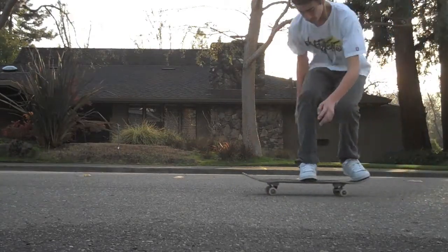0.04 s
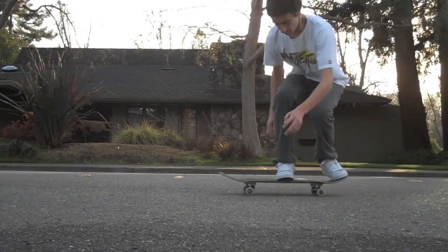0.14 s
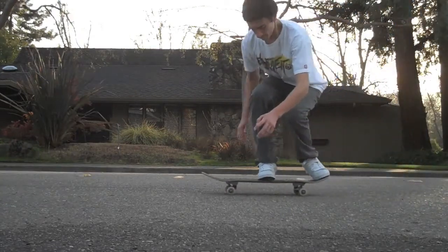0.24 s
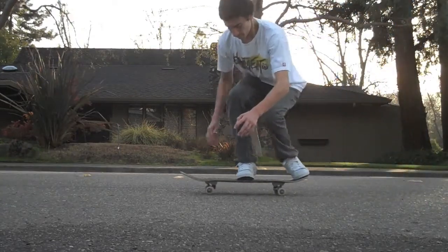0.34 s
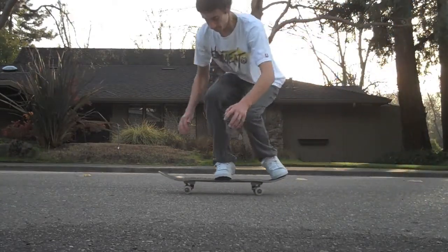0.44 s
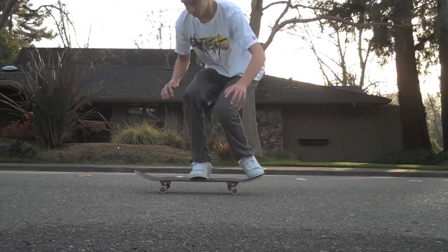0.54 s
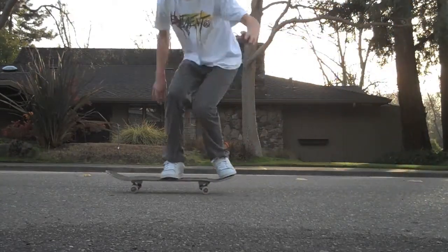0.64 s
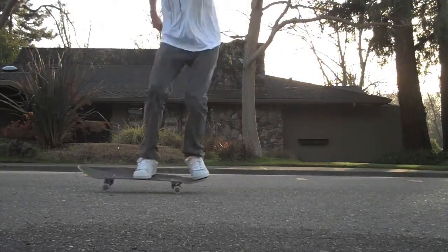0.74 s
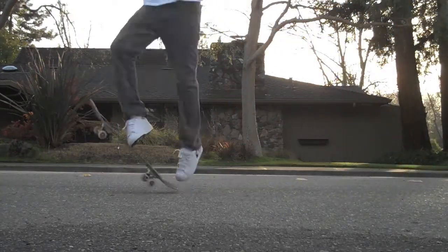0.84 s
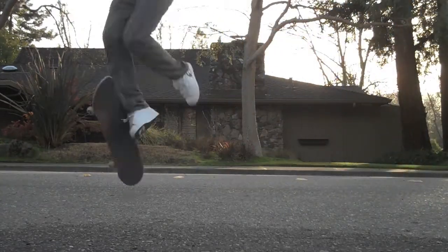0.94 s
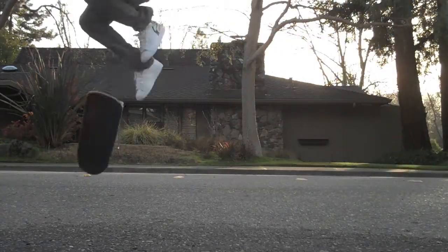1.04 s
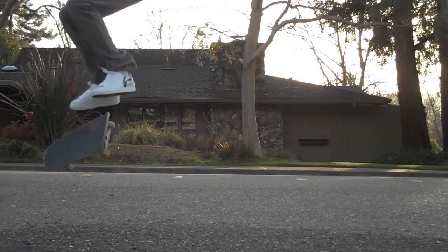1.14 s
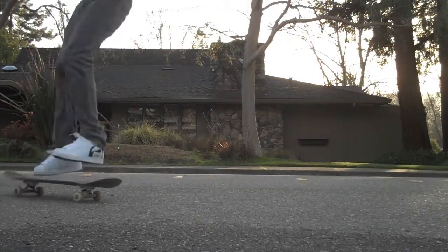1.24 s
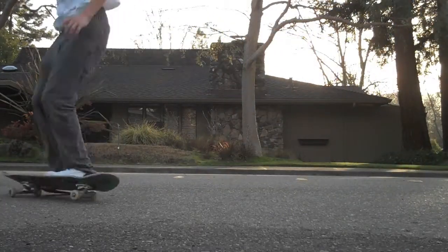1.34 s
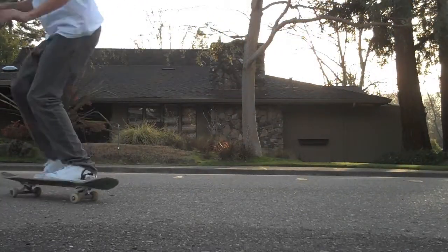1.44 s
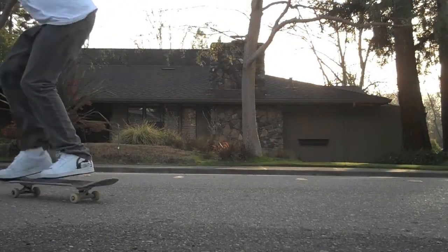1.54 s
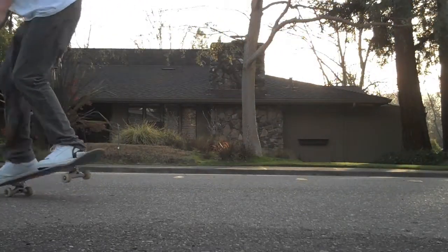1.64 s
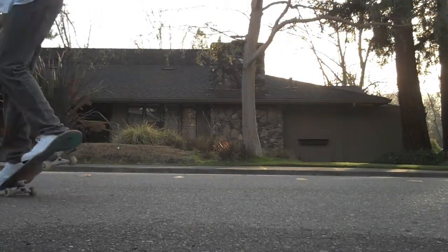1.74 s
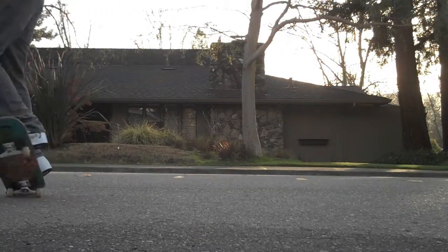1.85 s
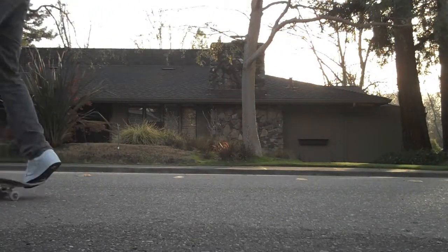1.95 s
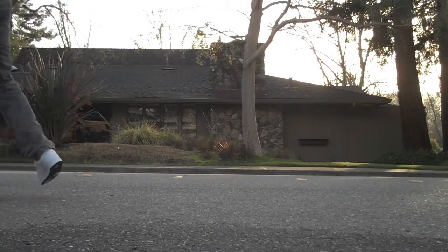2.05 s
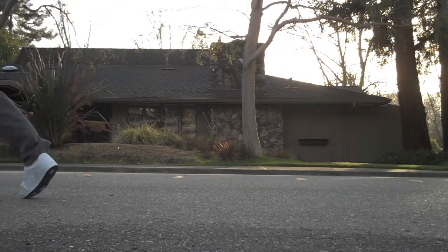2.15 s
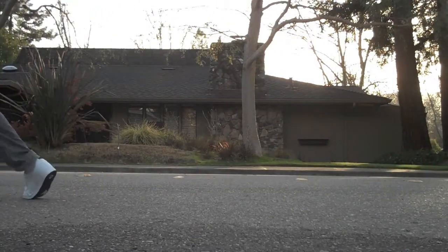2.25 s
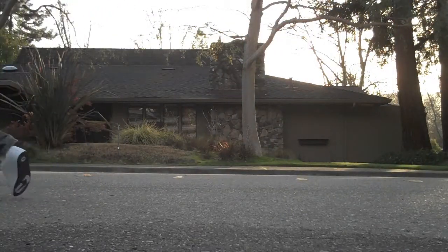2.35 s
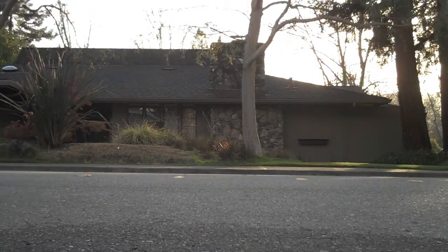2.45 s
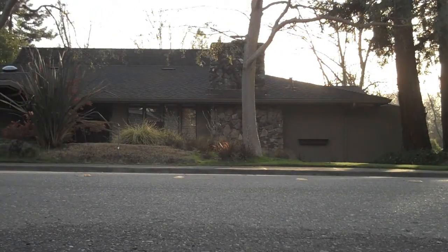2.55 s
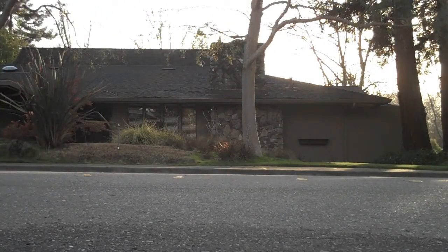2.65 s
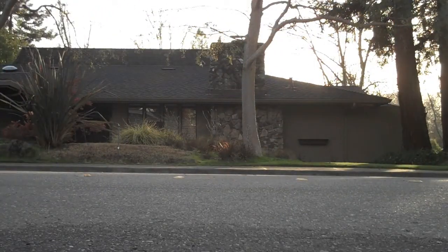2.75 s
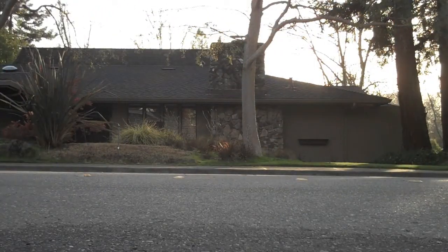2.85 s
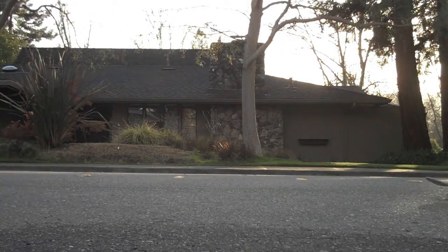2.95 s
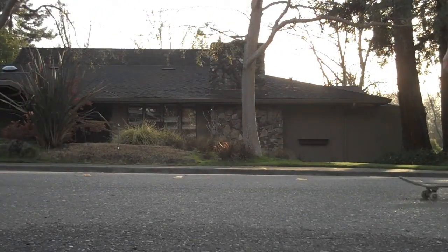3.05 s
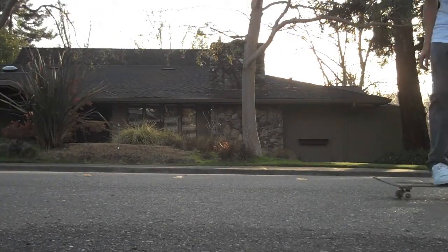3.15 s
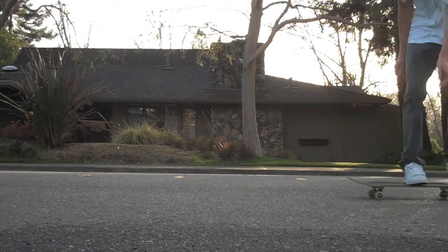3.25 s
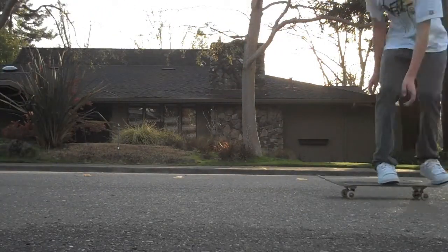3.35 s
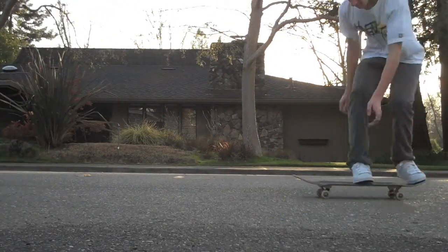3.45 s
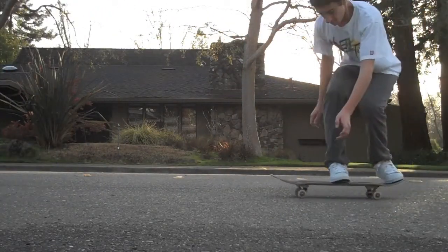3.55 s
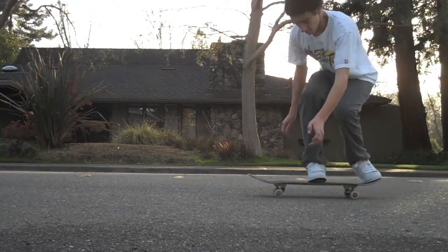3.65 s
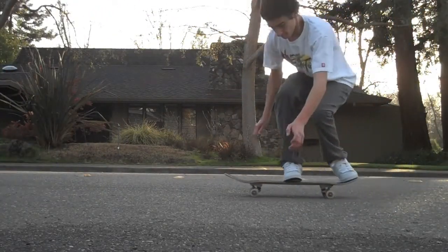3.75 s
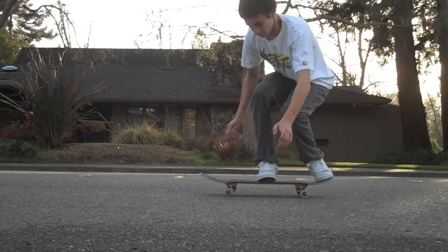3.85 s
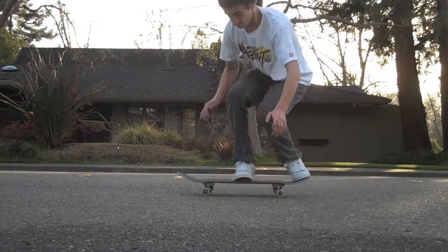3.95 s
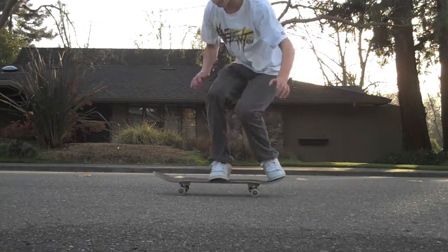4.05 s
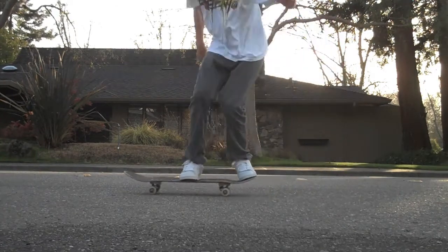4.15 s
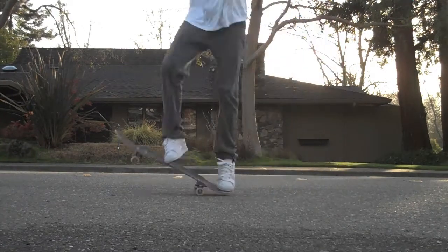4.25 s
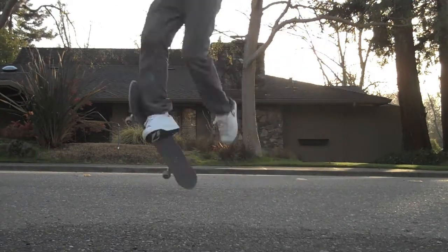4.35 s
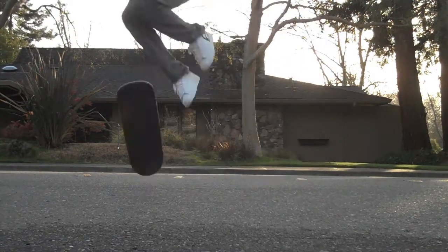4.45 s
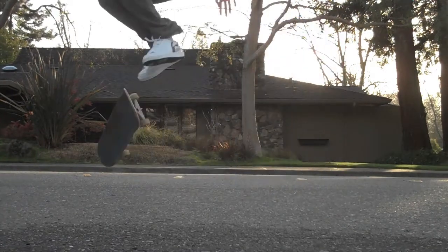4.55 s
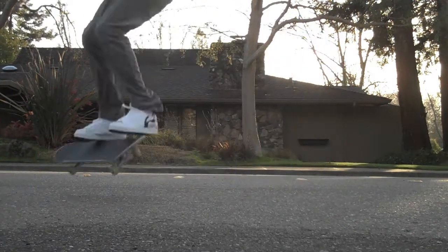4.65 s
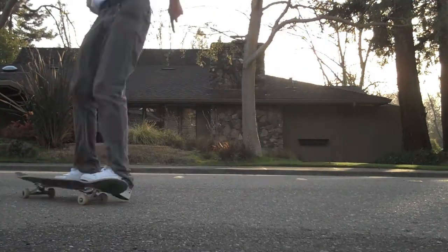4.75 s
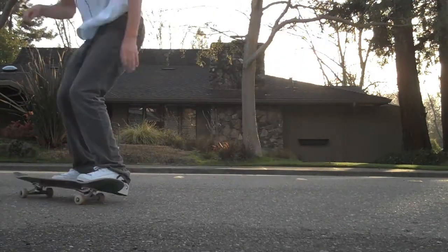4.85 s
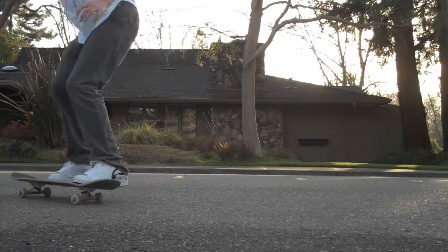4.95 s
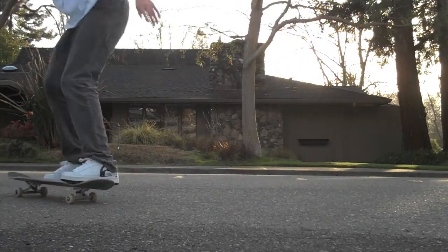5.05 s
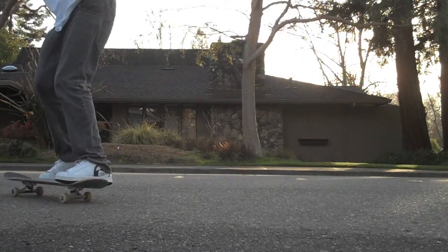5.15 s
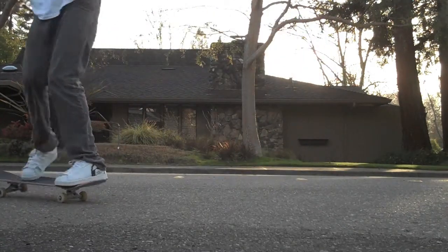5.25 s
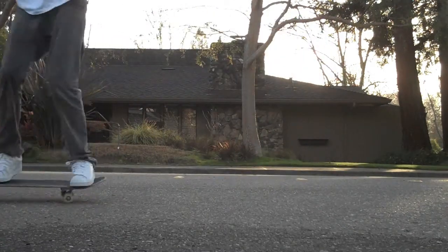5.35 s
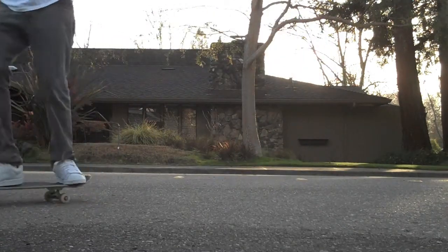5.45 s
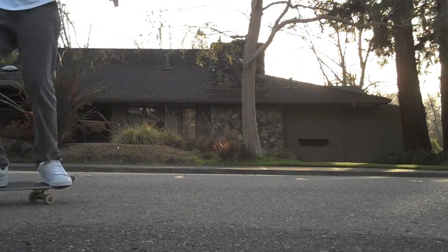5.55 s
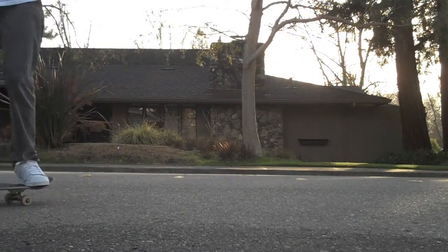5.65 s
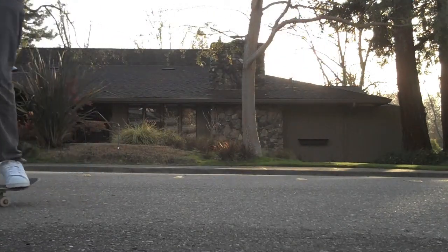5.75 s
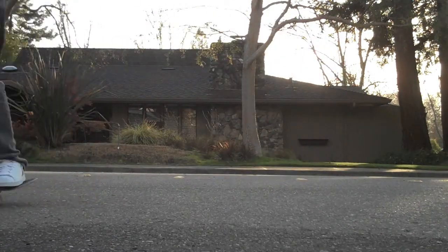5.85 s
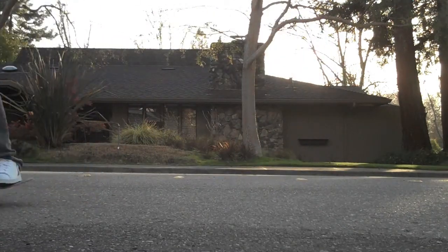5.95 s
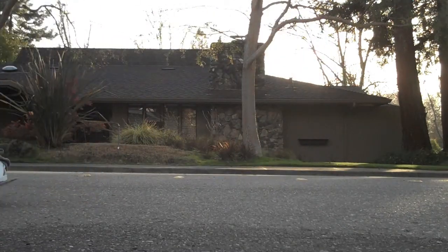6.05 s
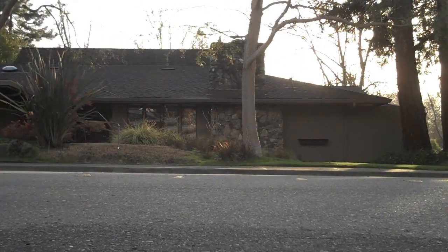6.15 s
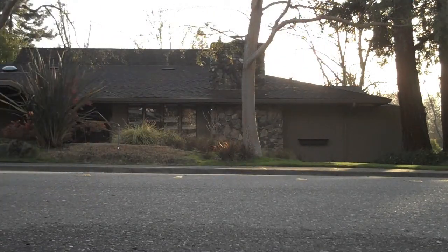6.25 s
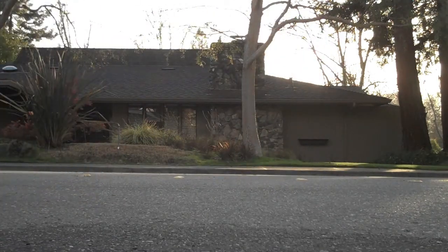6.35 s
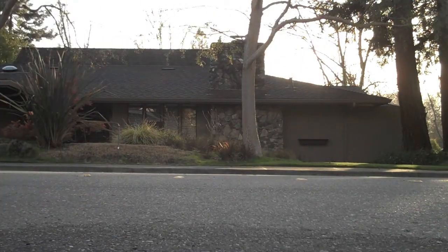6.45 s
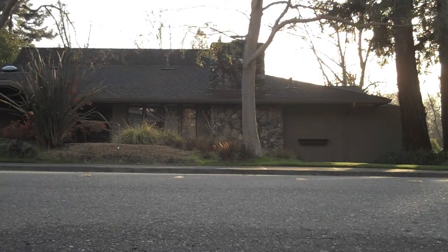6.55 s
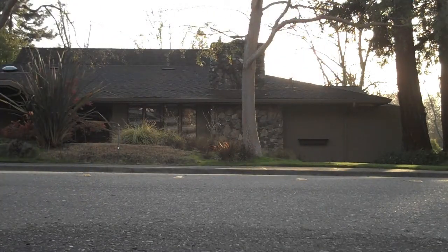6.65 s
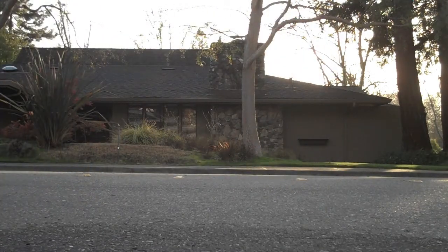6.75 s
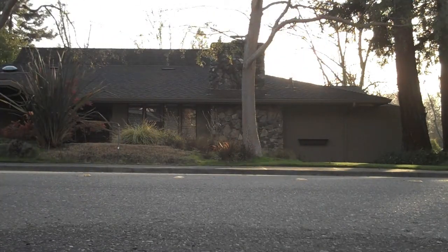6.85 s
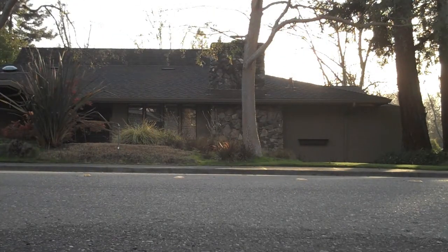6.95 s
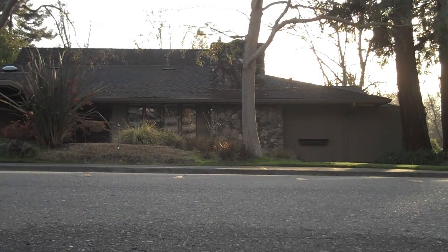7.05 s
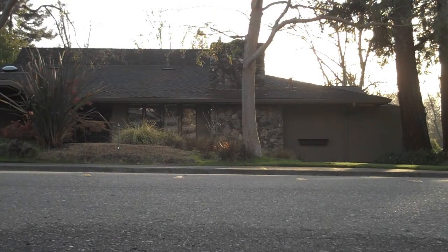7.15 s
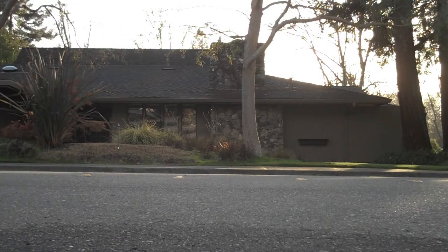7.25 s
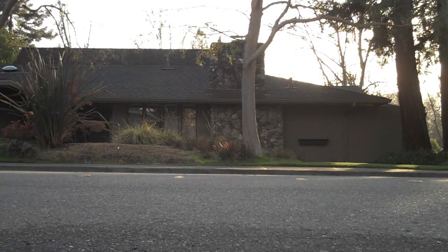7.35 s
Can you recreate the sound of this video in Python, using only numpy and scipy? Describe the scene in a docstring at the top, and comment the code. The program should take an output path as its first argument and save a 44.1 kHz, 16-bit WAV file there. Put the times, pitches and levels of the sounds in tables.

```python
"""A quiet street lined with houses, where a skateboard rolls past twice on coarse asphalt.
The rough road excites wheels and deck as noise. On each pass the tail pops on the road and rings in
its modes, the board flips with its bearings whirring, and wheels, trucks and deck land in a clatter.
Shoes scuff and squeak, the tail drags and the deck knocks as the rider steps off. Road and houses
reflect the sound; the street fades and a muffled low rumble closes the scene."""
import sys
import numpy as np
from scipy import signal
from scipy.fft import rfft, irfft
from scipy.io import wavfile

SR = 44100
rng = np.random.default_rng(int(sys.argv[2]) if len(sys.argv) > 2 else 0)


def wav_record(signal):
    """Record a signal, one row per channel, as 16-bit PCM in the file named by sys.argv[1]."""
    frames = np.transpose(np.atleast_2d(signal))
    bounded = np.clip(frames, -1, 1)
    # unit amplitude maps onto the largest positive 16-bit level
    quanta = np.round(bounded * 32767).astype(np.int16)
    wavfile.write(sys.argv[1], SR, quanta)


N = 326340
TIME = np.arange(N) / SR
HIT_TIME = TIME[:SR // 6]

# wheel load as the rider crouches and springs, one curve per run-up: t/s, level/dB
RUN_UPS = [
    [(0.015, -46.5), (0.065, -48.5), (0.125, -51.5), (0.147, -48), (0.185, -52.5), (0.479, -51.5),
     (0.511, -51), (0.533, -52), (0.645, -44), (0.8, -48.5)],
    [(2.6, -51), (2.622, -47.5), (3.49, -47.5), (3.688, -50.5), (3.748, -47.5), (3.954, -53), (4.046, -48),
     (4.176, -47), (4.184, -49.5), (4.25, -48.5)],
]
# slow coasting after the tricks: start/s, end/s, initial level/dB
COASTS = [(1.3, 2.592, -57.5), (4.731, 5.077, -60), (5.2, 5.86, -60.5), (6.039, 6.97, -61)]
# soles and wheels sliding: t/s, duration/s, roar level/dB, relative growl/dB, relative hiss/dB
SCUFFS = [(0.896, 0.081, -51.5, -3.5, 1), (1.296, 0.13, -53.5, -3, 2.5), (1.541, 0.072, -45, -3.5, -1.5),
          (1.648, 0.0095, -52.5, -15, -3), (1.899, 0.11, -43.5, -7.5, -3), (1.936, 0.057, -40, -7, -3),
          (2.053, 0.13, -41, 1, -3.5), (3.05, 0.28, -49.5, -17, 3), (4.347, 0.079, -49.5, -3, -2),
          (4.632, 0.06, -47.5, -2.5, 2), (4.747, 0.15, -46.5, -8, -9), (5.019, 0.042, -50.5, -14, -5),
          (5.198, .065, -59, -27, 1.5), (5.275, 0.075, -41.5, -2, 1), (5.342, .15, -41, -8, -4),
          (5.677, 0.16, -50.5, -24, 3.5), (5.87, 0.05, -65.5, 0, 8), (6.031, 0.079, -52, -10, -1.5),
          (6.108, 0.11, -47.5, -3.5, -2.5), (6.198, .11, -52.5, -2.5, 1.5), (6.663, 0.057, -55, -18, 1),
          (6.814, 0.069, -49, -7, 3.5)]
# spectra of the three rolling noises and of the bearings: f/Hz, spectral density/dB
GROWL_SPECTRUM = [(40, -29.5), (90, -20.5), (160, -11), (280, -4), (420, -1), (800, 0), (1000, 0.5),
                  (1500, -39)]
ROAR_SPECTRUM = [(500, -17), (850, -7.5), (1000, -5), (1250, 2), (1900, 3.5), (2400, -0.5), (3200, -9.5),
                 (4500, -35)]
HISS_SPECTRUM = [(2200, -10.5), (3500, 1), (4300, -1), (6500, 0), (8500, -3.5), (10500, -6), (12000, -11.5),
                 (14000, -17.5)]
BEARING_SPECTRUM = [(300, -13.5), (650, -2.5), (1300, -0.5), (2000, 0.5), (2700, -8), (3600, -16),
                    (6000, -22.5), (12000, -30)]
# tail on the road, two strikes to a pop: t/s, level/dB, contact decay/s, mode frequency ratio
POPS = [(0.8234, -18.5, 0.0019, 1.0), (0.8254, -21, .0022, 0.86), (4.2657, -17.5, 0.0025, 0.99),
        (4.2678, -27, .003, .86)]
# modes of the tail tip and of the maple deck with its trucks: f/Hz, level/dB, T60/s
TAIL_MODES = [(441, -20.5, 0.045), (1070, -16.5, 0.064), (1430, -9, 0.018), (1990, -11, 0.017),
              (2560, -0.5, 0.0068), (2995, 1.5, 0.011), (3270, 5, 0.0098), (3970, -5, 0.011),
              (5300, -14, 0.013), (7210, -13.5, .022)]
DECK_MODES = [(456, -22, 0.083), (622, -1, 0.044), (701, 0, 0.067), (1007, -1.5, 0.051),
              (1260, -14.5, 0.022), (1170, 12.5, .04), (1667, -1, 0.032), (1797, 8, 0.044),
              (2112, 0, 0.057), (2230, -1, 0.1), (2542, 5, 0.031), (2800, -3.5, 0.088), (3180, -1.5, 0.045),
              (3390, 2, 0.043), (3700, 2, 0.058)]
# the board slams down: t/s, level/dB, brightness/Hz, relative thud/dB, wheel spacing/s,
# loss per wheel/dB, rebound delay/s, rebound/dB re slam, second rebound/dB re first
LANDINGS = [(1.2478, -14.5, 1820, -9, .0051, 0.9, .0395, -7, -5.5),
            (4.6912, -9.5, 1570, -10, .0046, 1.9, 0.037, -7.5, -8),
            (1.9885, -12, 1150, -13, .003, 6.5, .0255, -12.5, -28)]
# knocks of deck and shoes: t/s, level/dB, brightness/Hz, relative thud/dB, relative crack/dB
KNOCKS = [(1.207, -40.5, 1245, 1, -1), (1.3498, -34.5, 1570, -23, -3.5), (1.3749, -29.5, 1910, -7.5, -2.5),
          (1.5934, -26, 2000, -26, -24), (1.819, -28, 1200, -20, -17), (1.827, -26.5, 1100, -21, -16),
          (1.839, -27, 1300, -9, -17), (1.969, -34, 1140, -10, -16), (2.832, -32.5, 1730, -27, -8),
          (3.781, -37.5, 820, -3, -6), (4.637, -32, 740, -5, -12), (4.817, -35, 1410, -3.5, 0),
          (5.393, -32, 1650, -9.5, -1.5), (5.439, -32, 1670, -12, -5), (6.699, -46, 1900, -30, -6),
          (6.84, -33.5, 2000, -14, 2), (6.897, -42.5, 1576, -18, -5)]
# loose stones cracking under a wheel or sole: t/s, level/dB
STONES = [(3.069, -43), (3.171, -41.5), (3.329, -41), (3.456, -41), (3.774, -41.5), (4.051, -44.5),
          (4.168, -40), (5.272, -43.5), (5.289, -39.5), (5.3021, -32), (5.312, -34.5), (5.319, -39),
          (5.342, -33.5), (5.351, -42), (5.368, -30.5), (5.408, -34), (5.767, -40.5), (5.843, -36),
          (5.857, -40.5), (5.994, -49), (6.142, -50), (6.18, -48), (6.23, -49.5), (6.388, -38.5),
          (6.4, -39.5), (6.471, -57), (6.68, -48.5), (6.723, -48.5)]
# wheels spinning freely during a flip: start/s, end/s, initial level/dB
SPINS = [(0.942, 1.275, -47), (4.383, 4.687, -47)]
# tail dragging on the road: t/s, duration/s, level/dB
DRAGS = [(1.59, 0.0095, -28), (1.815, 0.034, -27), (1.858, .03, -39), (5.732, 0.079, -47.5),
         (6.135, .06, -51.5), (6.831, 0.024, -33), (6.86, 0.043, -49)]
# rubber sole twisting on the deck: t/s, initial f/Hz, level/dB
SQUEAKS = [(.935, 3700, -43), (5.198, 4100, -52.5), (5.228, 2900, -53)]
# spectra of near and far reflections, ambient air and closing rumble: f/Hz, spectral density/dB
NEAR_ECHO_SPECTRUM = [(60, -27.5), (200, 10.5), (450, 4.5), (900, 2), (1800, 1.5), (2400, -2.5),
                      (3300, -10.5), (5000, 0.5), (10000, -40.5), (15000, -47.5)]
FAR_ECHO_SPECTRUM = [(150, -10.5), (450, -2.5), (900, -0.5), (1300, -2.5), (1750, -8), (2150, -3.5),
                     (2550, -15), (3400, -17.5), (6000, -31.5), (12000, -43)]
AIR_SPECTRUM = [(20, 3.5), (60, -13.5), (150, -4), (600, 0), (1800, -3), (4000, -11.5), (9000, -15),
                (14000, -41.5)]
RUMBLE_SPECTRUM = [(18, -53.5), (30, -23), (115, 0), (149, -8), (201, -5.5), (292, -14.5), (461, -10),
                   (726, -17.5), (939, -16.5), (1080, -22), (1730, -18.5), (2200, -21.5), (3400, -36.5),
                   (4420, -89), (7480, -120)]
# envelope of the rumble: t/s, relative level/dB
RUMBLE_ENVELOPE = [(7.0, -62), (7.024, -48.5), (7.108, -40), (7.268, -46.5), (7.286, -47), (7.376, -39.5),
                   (7.4, -45.5)]


def rolling(usual_load_db=-49.5, hollow_hz=497, sag_hz_per_db=16.5, judder_db=1.08):
    """Roughness excitation: stones under the wheels drive a hollow growl, the deck's roar and a hiss."""
    load = wheel_load()
    growl_gain, roar_gain, hiss_gain = road_gains(load, usual_load_db)
    excess_db = np.clip(20 * np.log10(load + 1e-9) - usual_load_db, -10, 10)
    pitch_hz = hollow_hz - sag_hz_per_db * excess_db   # the hollow note sinks under load
    roughness = bumps(per_s=170, spread_db=2.5, decay_s=0.0012, steady=1.0)
    force = rng.standard_normal((4, N)) * roughness
    hollow = rms_one(band(resonance(force[0], pitch_hz, width_hz=95), 260, 1300))
    growl = rms_one(coloured(force[1], GROWL_SPECTRUM) + from_db(-1) * hollow)
    roar = coloured(force[2], ROAR_SPECTRUM)
    hiss = coloured(force[3], HISS_SPECTRUM)
    road = growl_gain * growl + roar_gain * roar + hiss_gain * hiss
    return road * from_db(judder_db * drift(30))


def wheel_load(lift_s=0.034, coast_rise_db_per_s=1.5):
    """Rolling noise follows the contact load, which vanishes while the board is in the air."""
    load = np.zeros(N)
    for curve in RUN_UPS:
        on_road = gate(curve[0][0] - lift_s, curve[-1][0] + lift_s, lift_s, lift_s)
        load += from_db(in_time(curve)) * on_road
    for start, end, db in COASTS:
        load += from_db(db + coast_rise_db_per_s * (TIME - start)) * gate(start, end, lift_s, lift_s)
    return load


def road_gains(load, usual_load_db):
    """Incoherent sources add in power: rolling and scuffs set the gains of growl, roar and hiss."""
    growth = np.array([[0.066], [0], [0.2]])   # extra dB for each dB of load
    power = np.outer(from_db([2, -0.5, -2.5]), load) ** 2
    power *= (load / from_db(usual_load_db) + 1e-9) ** (2 * growth)
    for start, length, db, growl_db, hiss_db in SCUFFS:
        scuff = from_db(db) * gate(start, start + length, 0.18 * length, 0.31 * length)
        power += np.outer(from_db([growl_db, 0, hiss_db]), scuff) ** 2
    balance = from_db([[-1], [-0.2], [-1]])
    return balance * np.sqrt(power)


def tail_pops(chip_db=-9, scrape_db=-16):
    """Impact excitation: the hard tail tip rings in its modes and scrapes the road for an instant."""
    out = np.zeros(N)
    for s, db, decay_s, ratio in POPS:
        modes = np.array(TAIL_MODES) * [ratio, 1, 1]
        tip = unit_blow(band(ringing(modes, scatter_db=1.4), 290, 8300))
        chip = unit_blow(band(crunch(decay_s), 1800, 4500))
        scrape = unit_blow(band(crunch(0.025), 4500, 9000))
        add(out, s, from_db(db) * (tip + from_db(chip_db) * chip + from_db(scrape_db) * scrape))
    return out


def deck_impacts(ring_db=-4, weight_db=-5, heavy_db=-19, buzz=0.35):
    """Each impact gives contact noise and free vibration of the deck, a low thud and a bright crack."""
    out = np.zeros(N)
    for s, db, hz, thud_db, crack_db, duration_ratio in contacts():
        # only heavy blows shake the trucks and carry the rider's weight down into the bass
        heavy = np.tanh(from_db(db - heavy_db))
        rattle = buzz * heavy
        contact = band(crunch(0.003 * duration_ratio, rattle / 2), hz / 2.1, hz * 1.655, order=3)
        deck = band(ringing(DECK_MODES, scatter_db=1.8), hz / 2, hz * 2.93)
        body = unit_blow(unit_blow(contact) + from_db(ring_db) * unit_blow(deck))
        thud = unit_blow(band(crunch(0.0074), 370, 740))
        thud += heavy * from_db(weight_db) * unit_blow(band(crunch(0.007), 32, 260))
        crack = band(crunch(0.0029 * duration_ratio, rattle), 3500, 10000)
        crack = unit_blow(band(crack, 1500, 6600, order=1))
        blow = from_db(-0.13) * body + from_db(thud_db - 1) * thud + from_db(crack_db - 0.76) * crack
        add(out, s, from_db(db) * blow)
    return out


def contacts(stone_hz=1650, kick_hz=1420, rebound_hz=1170, kick_delay_s=0.019, truck_gap_s=0.015):
    """Inelastic collisions, each rebound weaker; rows as in KNOCKS, plus a contact duration ratio."""
    rows = [(*knock, 1) for knock in KNOCKS]
    rows += [(s, db, stone_hz, -12, 2, 0.85) for s, db in STONES]
    # the deck kicks back after each strike of the tail
    rows += [(s + kick_delay_s, -26.5, kick_hz, -24.5, -20, 1) for s, *_ in POPS]
    for s, db, hz, thud_db, gap_s, loss_db, rebound_s, rebound_db, second_db in LANDINGS:
        for wheel in range(4):
            rows.append((s + wheel * gap_s, db - wheel * loss_db, hz, thud_db, -7, 0.9))
        for truck in range(2):
            bounce_s = s + rebound_s + truck * truck_gap_s
            rows.append((bounce_s, db + rebound_db + truck * second_db, rebound_hz, -4.5, -6.5, 1))
    return rows


def bearing_whirr(loss_db_per_s=25, edge_s=0.05):
    """Free rotation: off the road, the noise of the bearings decays exponentially as they run down."""
    envelope = np.zeros(N)
    for start, end, db in SPINS:
        run_down_db = loss_db_per_s * np.maximum(TIME - start, 0)
        envelope += from_db(db - run_down_db) * gate(start, end, edge_s, edge_s)
    return envelope * coloured(rng.standard_normal(N), BEARING_SPECTRUM)


def tail_drags(deck_hz=1655, edge_s=0.003):
    """Forced vibration: the wooden tail catches on stone after stone and drives a deck resonance."""
    force = rng.standard_normal(N) * bumps(per_s=250, spread_db=3.5, decay_s=0.0015, steady=0.6)
    honk = band(resonance(force, np.full(N, deck_hz), width_hz=290), 900, 3300)
    envelope = sum(from_db(db) * gate(s, s + length, edge_s, edge_s) for s, length, db in DRAGS)
    return envelope * rms_one(honk)


def sole_squeaks(length_s=0.024, rise_hz_per_s=45000, jitter_hz=300):
    """Stick-slip friction: rubber on the deck gives short, rough, rising whistles."""
    out = np.zeros(N)
    t = TIME[:int(length_s * SR)]
    envelope = np.sin(np.pi * t / length_s)
    for s, hz, db in SQUEAKS:
        pitch_hz = hz + rise_hz_per_s * t + jitter_hz * drift(900)[:len(t)]
        add(out, s, from_db(db) * envelope * np.sin(2 * np.pi * np.cumsum(pitch_hz) / SR))
    return out


def street_echoes(x, near_db, far_db, near_decay_s, far_t60_s, far_hold_s):
    """Diffuse reflection: road and kerb scatter at once; houses and trees return a long, dull wash."""
    t = TIME[:SR * 3 // 2]
    near = coloured(rng.standard_normal(len(t)), NEAR_ECHO_SPECTRUM)
    near *= (1 - np.exp(-t / 0.0093)) * np.exp(-t / near_decay_s)
    far = coloured(rng.standard_normal(len(t)), FAR_ECHO_SPECTRUM)
    far *= (1 - np.exp(-t / 0.025)) * from_db(-60 * np.maximum(t - far_hold_s, 0) / far_t60_s)
    response = from_db(near_db) * near / np.linalg.norm(near)
    response += from_db(far_db) * far / np.linalg.norm(far)
    return signal.fftconvolve(x, response)[:N]


def closing_rumble(start_s=6.98, rise_s=0.021, lumps_db=2.7, cutoff_hz=3450):
    """Random amplitude modulation makes a low noise lumpy; a low-pass filter muffles it."""
    onset = np.clip((TIME - start_s) / rise_s, 0, 1)
    noise = coloured(rng.standard_normal(N), RUMBLE_SPECTRUM)
    envelope = onset * from_db(in_time(RUMBLE_ENVELOPE) + 1 + lumps_db * drift(40))
    return signal.sosfilt(signal.ellip(8, 0.5, 80, cutoff_hz, fs=SR, output="sos"), noise * envelope)


def ambient_air(level_db=-58):
    """Stationary broadband noise: the quiet air of the street."""
    return from_db(level_db) * coloured(rng.standard_normal(N), AIR_SPECTRUM)


def street_gain(dip_s=2.541, dip_half_width_s=0.028, dip_db=-24, fade_s=6.91, fade_db_per_s=331):
    """Attenuation: the level dips briefly once, and decays exponentially at the end."""
    dip = np.maximum(1 - np.abs(TIME - dip_s) / dip_half_width_s, 0)
    return from_db(dip_db * dip - fade_db_per_s * np.maximum(TIME - fade_s, 0))


def ringing(modes, scatter_db):
    """Modal superposition: one blow starts damped sinusoids of scattered strength and random sign."""
    hz, db, t60 = np.transpose(modes)[:, :, None]
    strength = from_db(db + scatter_db * rng.standard_normal(hz.shape)) * rng.choice([-1, 1], hz.shape)
    return np.sum(strength * from_db(-60 * HIT_TIME / t60) * np.sin(2 * np.pi * hz * HIT_TIME), axis=0)


def crunch(decay_s, rattle=0, rattle_s=0.019):
    """Contact noise: a fast-decaying burst of tiny impacts on stone, then any buzz of loose hardware."""
    envelope = np.exp(-HIT_TIME / decay_s) + rattle * np.exp(-HIT_TIME / rattle_s)
    return envelope * rng.standard_normal(len(HIT_TIME))


def bumps(per_s, spread_db, decay_s, steady):
    """Shot-noise envelope: random drops off stones add bursts of energy to a steady contact; rms 1."""
    sizes = from_db(spread_db * np.minimum(rng.exponential(1, N), 3.5))
    drops = sizes * (rng.random(N) < per_s / SR)
    energy = signal.lfilter([1], [1, -np.exp(-1 / (decay_s * SR))], drops ** 2 + 1e-18)
    return rms_one(np.sqrt(energy / energy.mean() + steady))


def resonance(x, hz, width_hz, block=128):
    """Response of a two-pole resonator whose centre frequency follows a curve; rms 1."""
    radius = np.exp(-np.pi * width_hz / SR)
    out, state = np.zeros(N), np.zeros(2)
    for i in range(0, N, block):
        poles = [1, -2 * radius * np.cos(2 * np.pi * hz[i] / SR), radius * radius]
        out[i:i + block], state = signal.lfilter([1, 0, -1], poles, x[i:i + block], zi=state)
    return rms_one(out)


def coloured(x, spectrum):
    """Spectral shaping, falling 20 dB per octave past the ends of the table; rms 1."""
    hz, db = np.transpose(spectrum)
    f = np.maximum(np.arange(len(x) // 2 + 1) * SR / len(x), 1)
    octaves_outside = np.abs(np.log2(f / np.clip(f, hz[0], hz[-1])))
    gain = from_db(np.interp(np.log(f), np.log(hz), db) - 20 * octaves_outside)
    return rms_one(irfft(rfft(x) * gain, len(x)))


def band(x, low_hz, high_hz, order=2):
    """Causal band-pass filter."""
    sections = signal.butter(order, [low_hz, high_hz], "band", fs=SR, output="sos")
    return signal.sosfilt(sections, x + 1e-18)


def drift(per_s):
    """Random fluctuation, linear between evenly spaced values; rms 1."""
    points = rng.standard_normal(int(N / SR * per_s) + 2)
    return rms_one(np.interp(TIME * per_s, np.arange(len(points)), points))


def gate(start_s, end_s, rise_s, fall_s):
    """Trapezoidal envelope: rise, hold at 1 and fall between two times."""
    return np.clip(np.minimum((TIME - start_s) / rise_s, (end_s - TIME) / fall_s), 0, 1)


def in_time(curve):
    """Linear interpolation of (t/s, value) rows at every sample."""
    return np.interp(TIME, *np.transpose(curve))


def add(track, s, sound):
    """Superpose a sound on a track from time s."""
    at = int(s * SR)
    track[at:at + len(sound)] += sound[:N - at]


def unit_blow(x):
    """Normalise a transient to the energy of 5 ms at rms 1."""
    return x / np.sqrt(np.sum(x ** 2) / (0.005 * SR) + 1e-20)


def rms_one(x):
    """Normalise to unit mean power."""
    return x / np.sqrt(np.mean(x ** 2) + 1e-20)


def from_db(db):
    """Amplitude ratio of a level."""
    return 10 ** (np.asarray(db) / 20)


def scene():
    """Superposition of the board's direct sound, its reflections, the air and the rumble, in mono."""
    pops = tail_pops()
    board = deck_impacts() + rolling() + bearing_whirr() + tail_drags() + sole_squeaks()
    # the tilted deck throws its pop at the houses; lying flat it radiates less their way
    echoes = street_echoes(pops, near_db=-12.5, far_db=-20.5,
                           near_decay_s=0.023, far_t60_s=0.59, far_hold_s=0.36)
    echoes += street_echoes(board, near_db=-21.5, far_db=-37.5,
                            near_decay_s=0.027, far_t60_s=1.0, far_hold_s=0.14)
    street = (pops + board + echoes + ambient_air()) * street_gain()
    return (street + closing_rumble())[None]


def record(dry, ceiling=0.72, sag=0.18, recover_s=0.075, cutoff_hz=13950):
    """Saturation: loud peaks are rounded and briefly lower the preamplifier's bias; the top is cut."""
    rounded = ceiling * np.tanh(dry / ceiling)
    pole = np.exp(-1 / (recover_s * SR))
    bias = sag * signal.lfilter([1 - pole], [1, -pole], np.abs(rounded))
    return signal.sosfilt(signal.ellip(10, 0.2, 70, cutoff_hz, fs=SR, output="sos"), rounded - bias)


dry = scene()
out = record(dry)
wav_record(out)
```